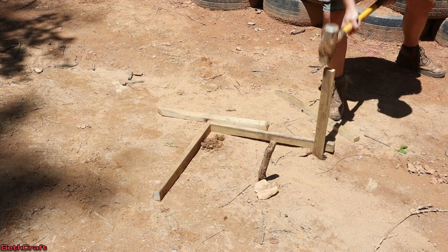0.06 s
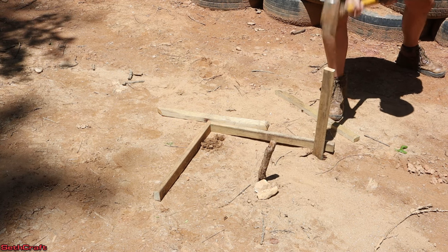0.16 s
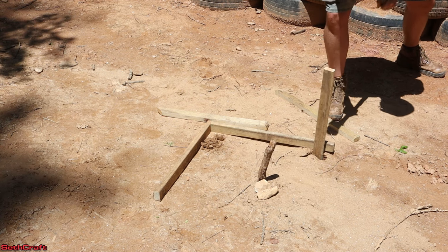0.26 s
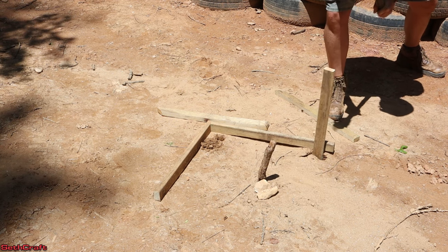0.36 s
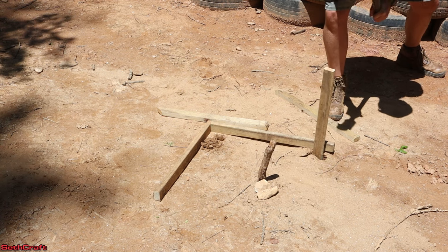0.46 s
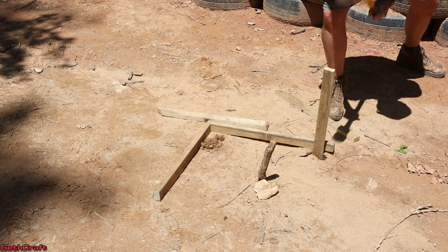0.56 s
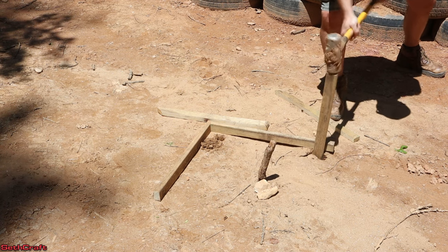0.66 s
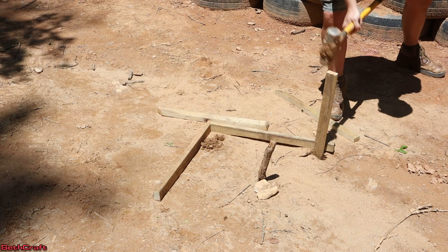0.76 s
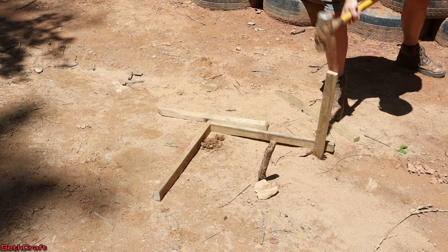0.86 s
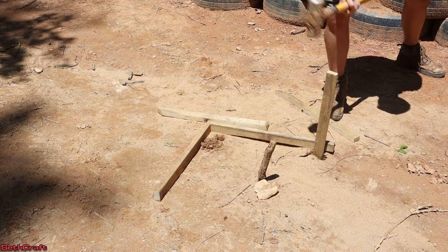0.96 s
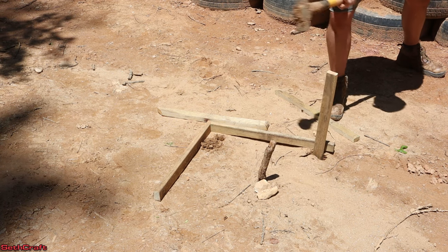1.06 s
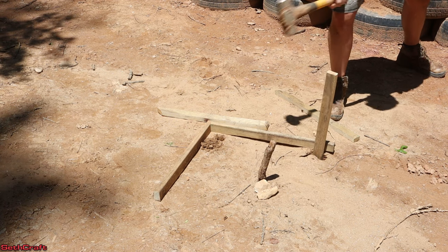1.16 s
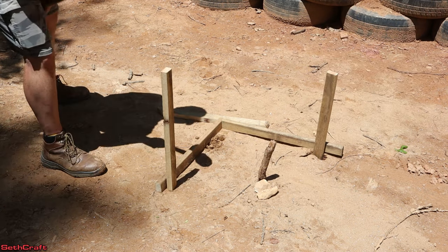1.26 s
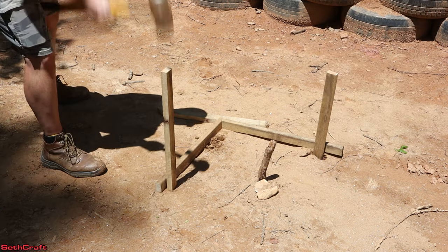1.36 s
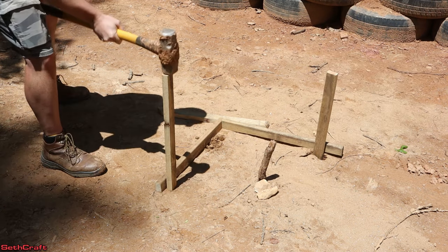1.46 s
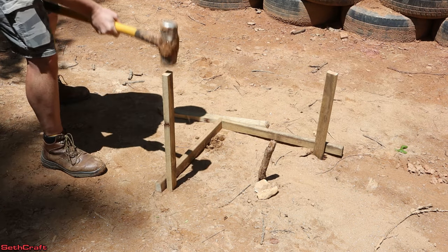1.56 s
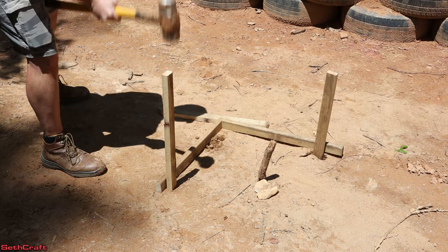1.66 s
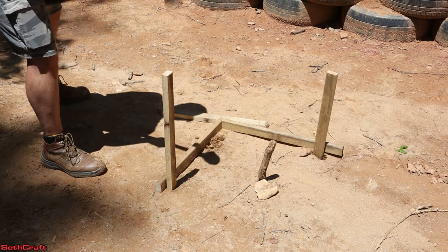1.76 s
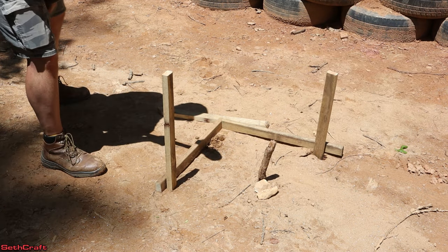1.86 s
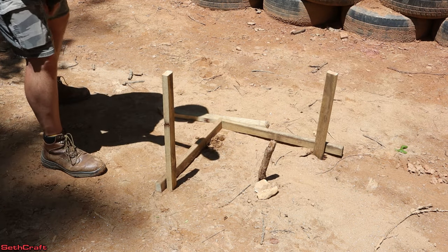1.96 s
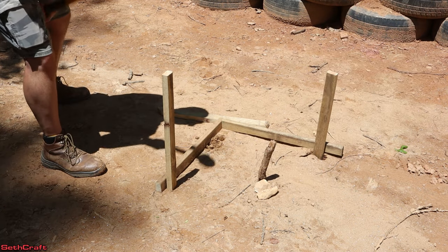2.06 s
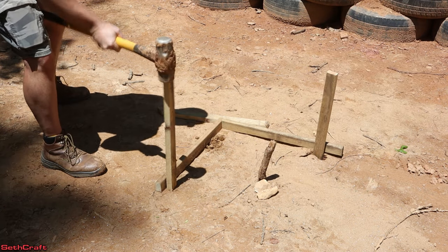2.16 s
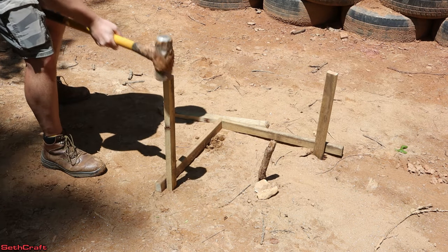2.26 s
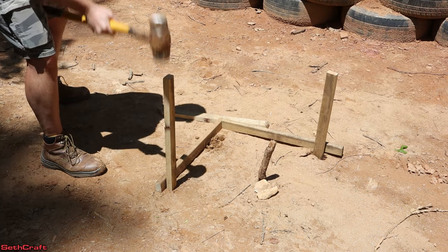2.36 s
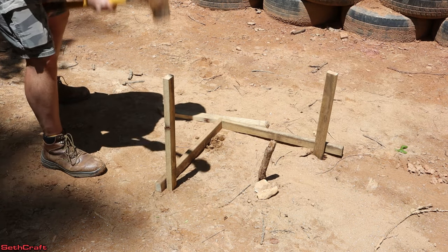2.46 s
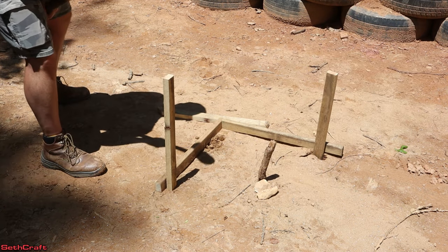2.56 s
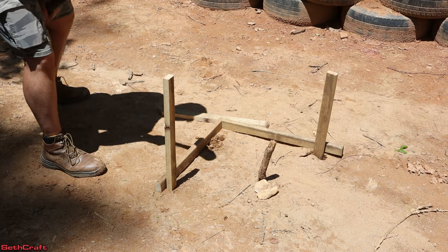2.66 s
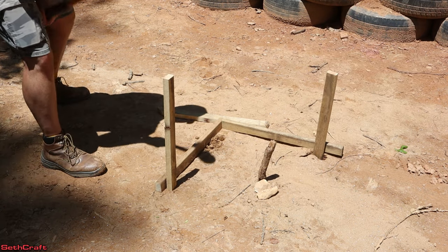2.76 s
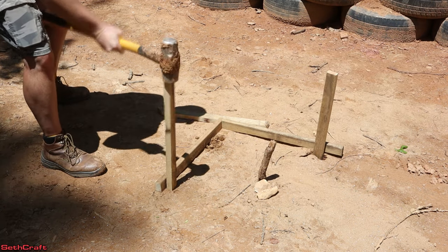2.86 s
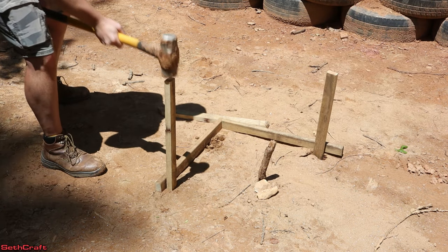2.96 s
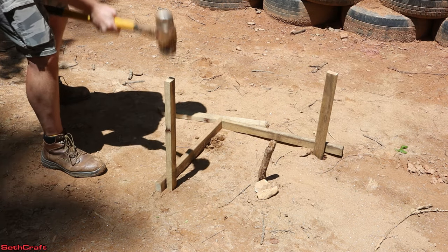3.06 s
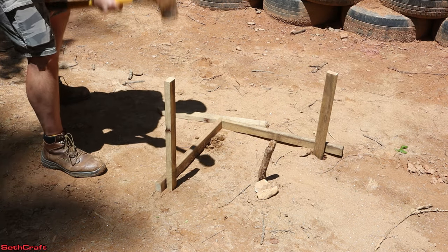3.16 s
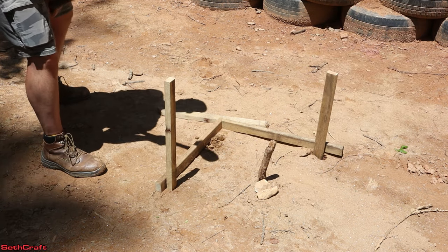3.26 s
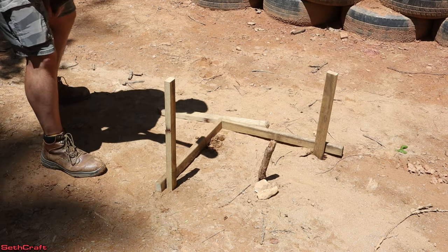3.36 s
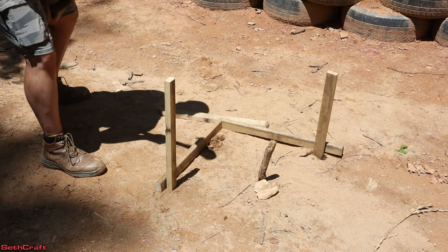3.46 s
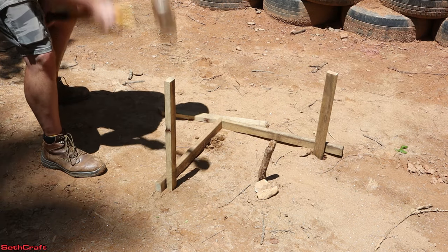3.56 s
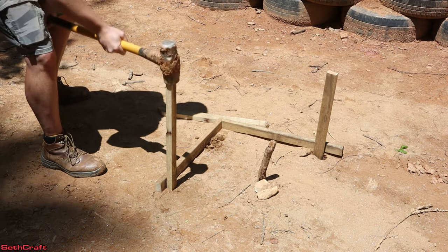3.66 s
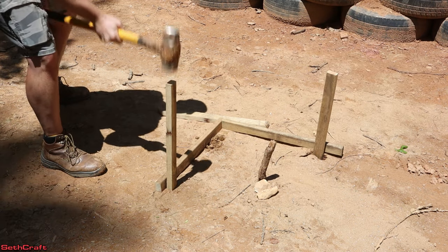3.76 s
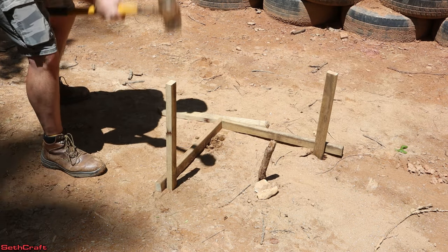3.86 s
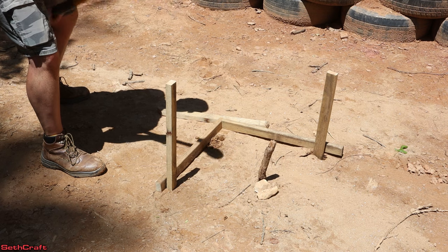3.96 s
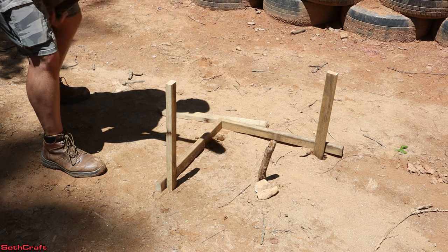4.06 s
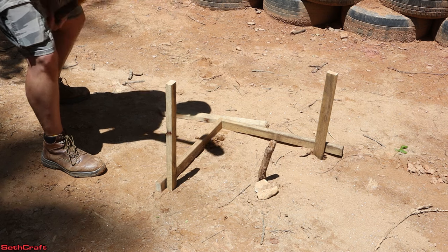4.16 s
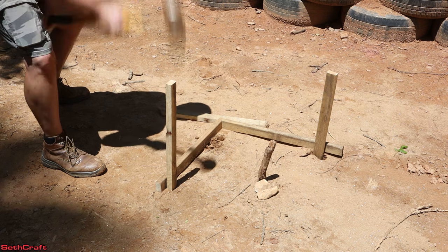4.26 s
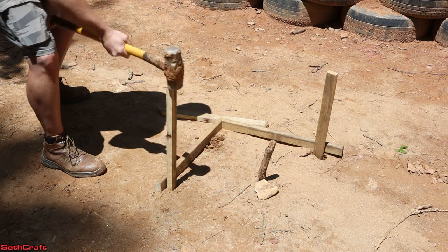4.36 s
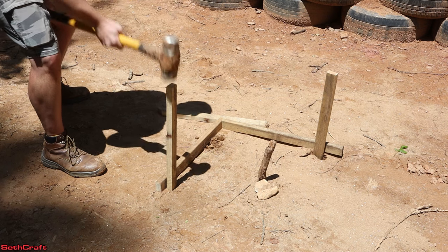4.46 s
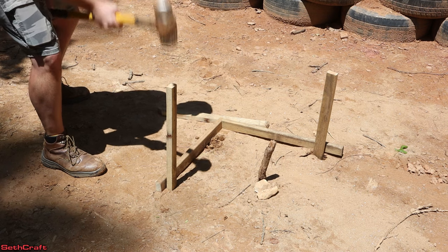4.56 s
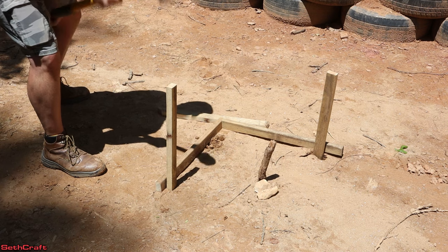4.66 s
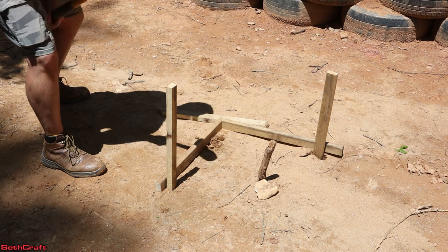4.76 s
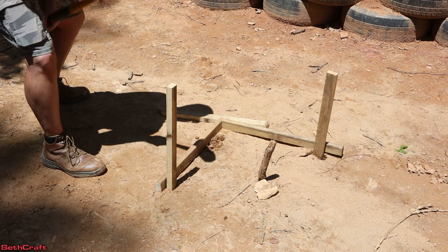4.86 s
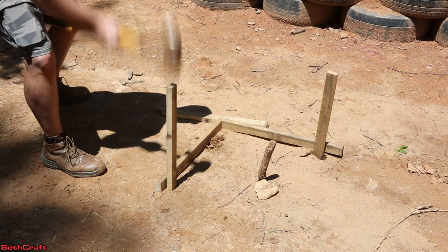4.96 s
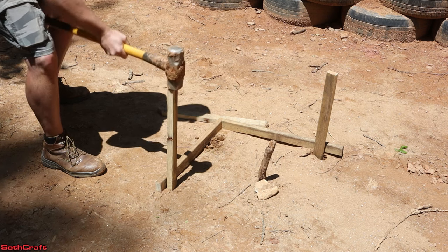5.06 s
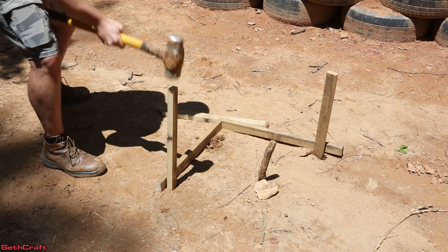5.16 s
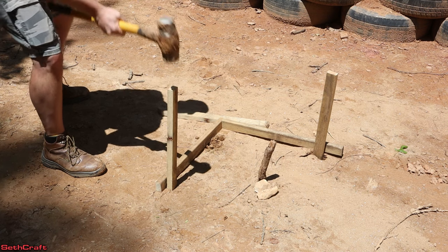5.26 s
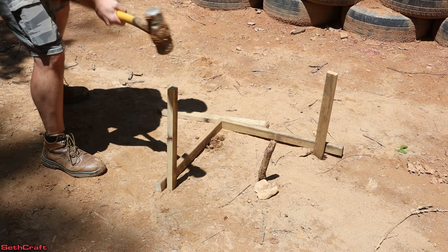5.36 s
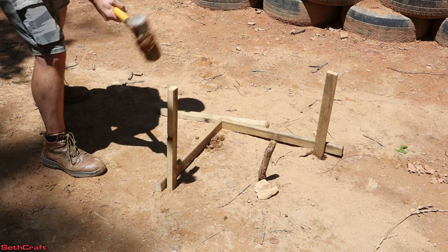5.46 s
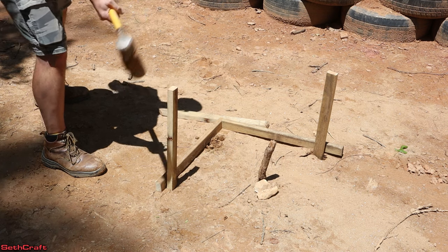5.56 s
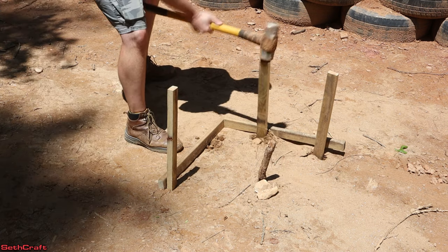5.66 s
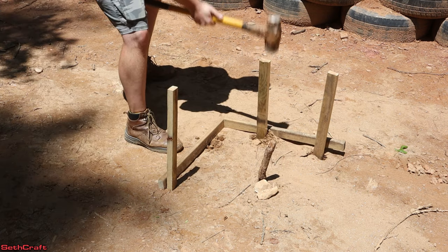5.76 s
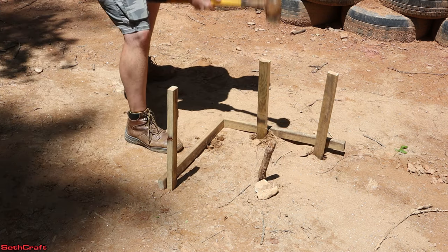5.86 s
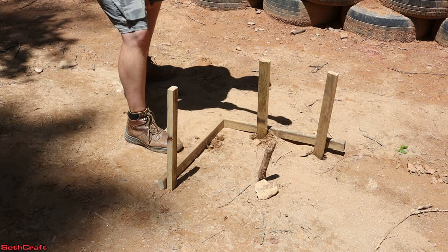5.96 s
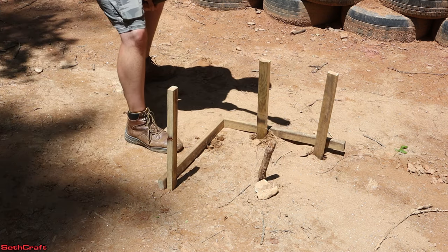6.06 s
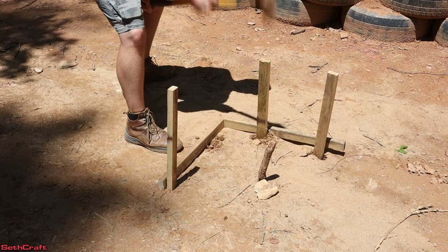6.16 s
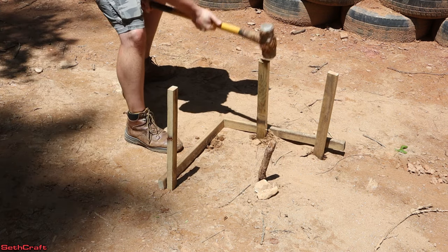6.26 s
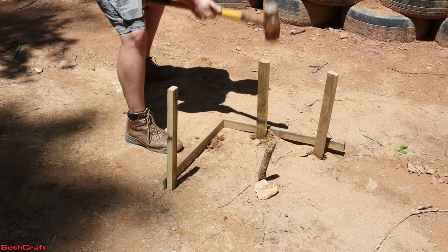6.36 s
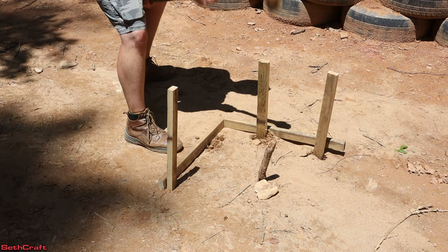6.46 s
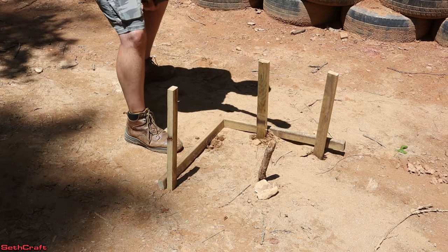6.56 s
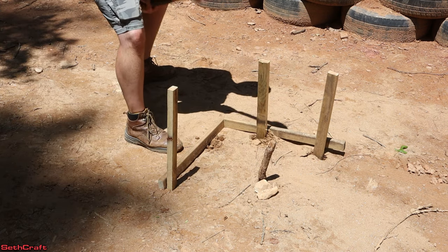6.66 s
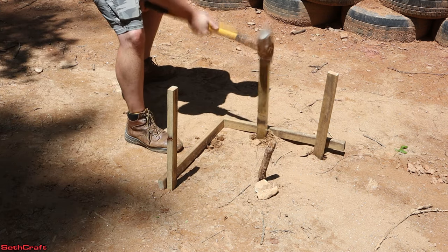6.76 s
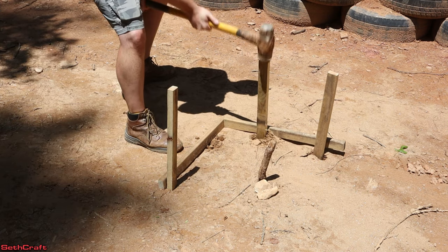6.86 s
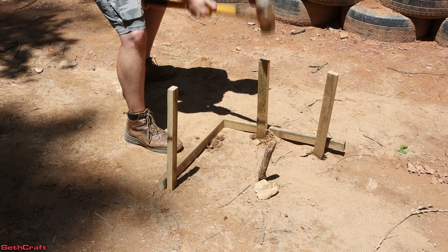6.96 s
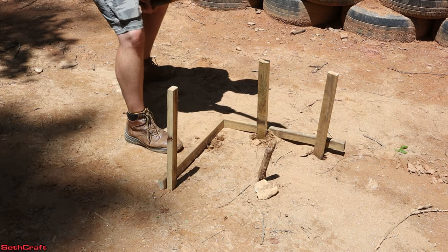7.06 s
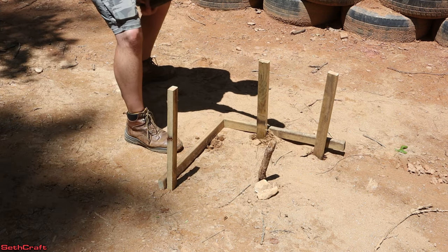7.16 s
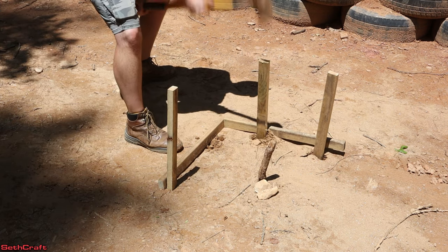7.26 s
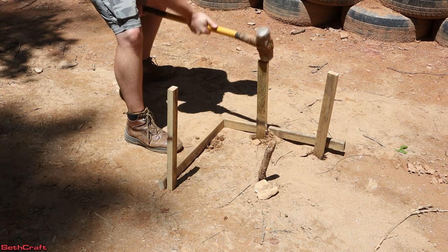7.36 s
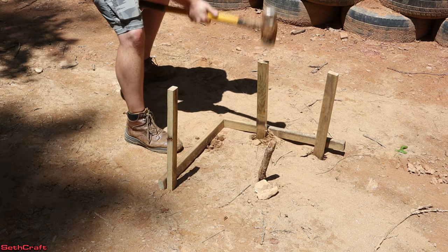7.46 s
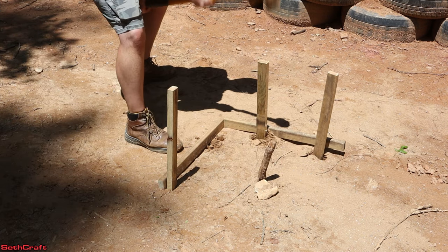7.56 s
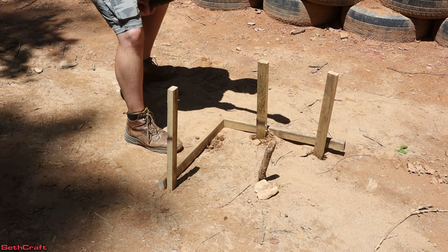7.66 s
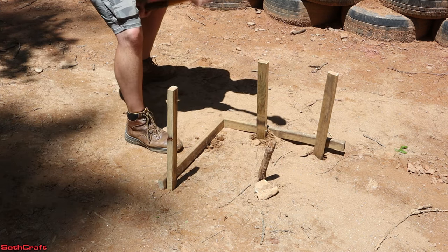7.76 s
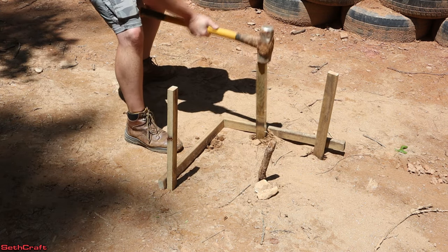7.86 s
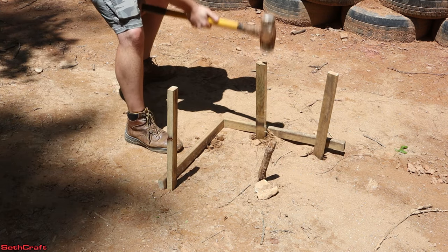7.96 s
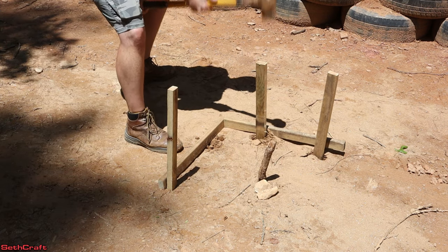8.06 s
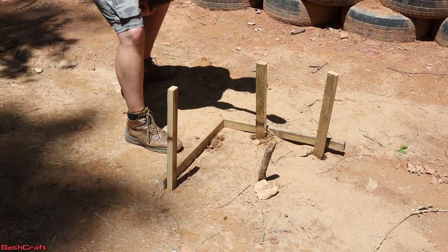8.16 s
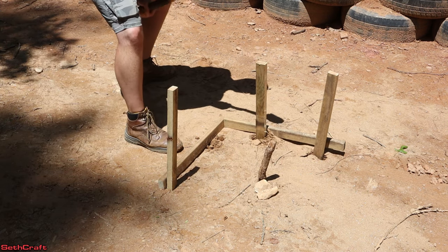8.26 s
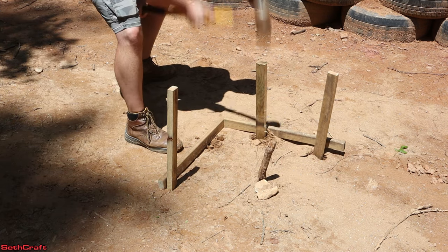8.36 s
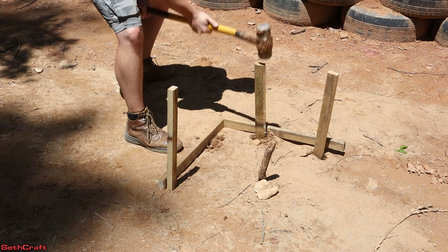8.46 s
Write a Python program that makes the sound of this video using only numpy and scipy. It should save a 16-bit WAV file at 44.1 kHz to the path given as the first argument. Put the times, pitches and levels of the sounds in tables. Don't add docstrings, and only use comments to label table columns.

```python
import sys
import numpy as np
from scipy import signal
from scipy.fft import rfft, irfft
from scipy.io import wavfile

SR = 44100
rng = np.random.default_rng(int(sys.argv[2]) if len(sys.argv) > 2 else 0)


def voltage_ratio(level):
    return 10 ** (np.asarray(level, float) / 20)


def waveform_to_disk(signal):
    frames = np.transpose(np.atleast_2d(signal))
    scaled = np.clip(frames, -1, 1) * 32767
    samples = np.round(scaled).astype(np.int16)
    wavfile.write(sys.argv[1], SR, samples)


N = 375408
TIME = np.arange(N) / SR

# start in seconds, loudness in the trees in dB, sustain of the ring as a factor, soil
# thud in dB, low pulse in dB.
BLOWS = [(0.049, -20, 0.7, -46.5, -22), (0.7345, -21.5, 0.55, -39.5, -40.5),
         (1.499, -12.5, 0.9, -56.5, -35.5), (2.243, -18, 0.46, -49.5, -38), (2.9521, -12, 0.98, -41, -12),
         (3.6999, -15.5, 0.4, -38, -20), (4.3966, -18, 0.7, -41.5, -39.5), (5.08, -14, 0.9, -50, -39.5),
         (5.7495, -20, 0.62, -35, -33), (6.3196, -30.5, 0.43, -25, -25.5), (6.865, -32.5, 0.3, -22, -36),
         (7.418, -25.5, 0.51, -26, -25.5), (7.9532, -27.5, 0.35, -26.5, -42.5),
         (8.4956, -25, 0.35, -30, -25.5)]
# first lengthwise resonance in Hz, step to the next in Hz,
# slope over the upper ones in dB per step, lead resonance heard nearby in Hz, steel click in dB.
LANDINGS = [(900, 830, .5, 1700, -7), (950, 830, -1, 1300, -8), (1470, 735, -3, 1950, -7.5),
            (1340, 750, -3.5, 1710, -10), (920, 910, -3.5, 1800, -8.5), (1450, 740, -4.5, 1840, -7),
            (1060, 800, -5, 1900, -14.5), (970, 925, -4, 1930, -10.5), (1150, 800, -6, 1250, -12),
            (1300, 770, -2, 1380, -14), (820, 940, -2.5, 1130, -18), (1070, 810, -5, 1430, -12.5),
            (1120, 820, -4, 1460, -14), (1050, 850, -5, 1440, -12)]
SCENE_ENDS_S = [
    1.25,
    5.655,
    9,
]
OVERLOAD = [.275, .315, .27]


def rms_one(x):
    return x / np.sqrt(np.mean(x ** 2) + 1e-20)


def at_hz(points, hz, axis=1):
    points = np.array(points)
    return np.interp(np.log(hz), np.log(points[:, 0]), points[:, axis])


def mode(hz, db, t60, t):
    return voltage_ratio(db - 60 * np.maximum(t, 0) / t60) * np.sin(2 * np.pi * hz * t) * (t > 0)


def add(out, start_s, x, end_s=9):
    i = round(start_s * SR)
    x = x[:max(min(N, round(end_s * SR)) - i, 0)]
    out[i:i + len(x)] += x


def drift(rate):
    knots = rng.standard_normal(int(N / SR * rate) + 2)
    return np.interp(TIME * rate, np.arange(len(knots)), knots)


def bandpass(order, low_hz, high_hz, x):
    sos = signal.butter(order, [low_hz, high_hz], "band", fs=SR, output="sos")
    return signal.sosfilt(sos, x)


def bands(size):
    white = rng.standard_normal((2, size))
    edges = 50 * 2 ** np.arange(0, 8.6, .5)
    for k, (low, high) in enumerate(zip(edges, edges[1:])):
        yield np.sqrt(low * high), bandpass(2, low, high, white[k % 2])


def coloured(spectrum, patchy_db):
    return rms_one(sum(voltage_ratio(at_hz(spectrum, hz) + patchy_db * drift(7.9)) * band for hz, band in bands(N)))


def blows():
    # lengthwise ring at the microphone in dB, crack in dB, bank echo in ms,
    # bank echo in dB, swell of the trees in ms, t60 at the microphone in seconds.
    stakes = [
        (-7.5, -10, 9, -10.5, 73, 0.0061),
        (-2, -11.5, 12, -16, 85, 0.0098),
        (-5.5, -15, 9.6, -6.5, 38, 0.0056),
    ]
    # clutter in dB, its t60 in seconds, echo of a near row as a factor,
    # share of scatter before the swell.
    places = [
        (-15.5, 0.3, 0.92, 0.45),
        (-17.5, 0.36, 1.1, 0.55),
        (-12, 0.13, .5, 0.76),
    ]
    echoes = []
    for stake, (clutter_db, clutter_t60, row_size, early) in zip(stakes, places):
        wood = trees(stake[4], row_size, early)
        echoes.append((wood, bank(stake[2], clutter_db, clutter_t60)))
    out, t = np.zeros(N), np.arange(12000) / SR
    for k, (s, far_db, sustain, thud_db, pulse_db) in enumerate(BLOWS):
        n = np.searchsorted(SCENE_ENDS_S, s)
        ring_db, crack_db, _, echo_db, _, near_t60 = stakes[n]
        wood, near_bank = echoes[n]
        ring, scattered = stake_ring(k, n, t, sustain)
        ring = voltage_ratio(ring_db) * ring / np.abs(ring).max()
        near = near_blow(k, n, t, ring, crack_db, near_t60, sustain, far_db)
        low_pulse = -mode(200, pulse_db, 0.017, t)
        add(out, s, near + low_pulse)
        add(out, s, voltage_ratio(echo_db) * signal.fftconvolve(near[:1500], near_bank))
        from_wood = voltage_ratio(far_db - 34.0) * signal.fftconvolve(scattered[:900], wood)
        add(out, s - 300 / SR, from_wood, SCENE_ENDS_S[n])
        add(out, s + 0.0058, -soil_thud(thud_db, t))
    return out


def near_blow(k, n, t, ring, crack_db, near_t60, sustain, far_db):
    # multiple of the lead, level in dB.
    facing = [
        [(.62, 0), (.95, 0.5), (1.97, 2.5), (3.1, -5)],
        [(.56, -10.5), (1, 0.5), (1.27, -2.5), (1.5, -4.5)],
        [(.62, 0), (1, 1.5), (1.55, -9.5), (2.0, -15)],
    ]
    # frequency in Hz, level in dB, t60 in seconds.
    knock = [
        (684, -12, 0.006),
        (745, -13, 0.0058),
        (560, -19, 0.0021),
    ]
    drive_db = [13, 12, 12][n] + 0.43 * far_db + 5.5
    lead_hz, click_db = LANDINGS[k][-2:]
    near = ring
    for x, db in facing[n]:
        hz = x * lead_hz
        near = near - mode(hz, db, (near_t60 + 4 / hz) * (0.55 + .5 * sustain), t)
    grit = bandpass(1, 1200, 9000, rng.standard_normal(len(t)))
    near = near + grit * voltage_ratio(crack_db + click_db + 12 - 60 * t / 0.006)
    knock_hz, knock_db, _ = knock[n]
    near = near - (1.4 - sustain) * 2.4 * mode(*knock[n], t) + mode(1.6 * knock_hz, knock_db, 0.012, t)
    near = near * (1 - np.exp(-(t / 0.00066) ** 2))
    near = signal.sosfilt(signal.butter(2, 300, "high", fs=SR, output="sos"), near)
    return OVERLOAD[n] * voltage_ratio(drive_db) * near / np.abs(near).max()


def stake_ring(k, n, t, sustain):
    levels = [
        (-5.5, 0, -1.5, 1.1, 0.12, -3.5, -11.5, -15.5),
        (-15, 0.048, 0.5, .5, -0.42, -2, -4, -5.5),
        (-4, 0.35, -3.5, 0.46, 0.45, -1.5, -7, -8.5),
    ]
    decays = [0.031, 0.014, 0.011, 0.014, 0.019, 0.017, .011, 0.0069]
    first_hz, step_hz, tilt_db, _, click_db = LANDINGS[k]
    parts = []
    for j, (db, t60) in enumerate(zip(levels[n], decays)):
        part = mode(first_hz + j * step_hz, db + tilt_db * max(j - 1, 0), t60 * sustain, t)
        parts.append(part * (-1) ** j / np.sqrt(t60 / 0.0068))
    parts.append(mode(3100, -1.0, 0.0021, t))
    parts = np.array(parts)
    parts = parts / np.sqrt(np.sum(parts ** 2))
    click = mode(9000, click_db - 7, .0006, t)
    power = np.sum(np.abs(rfft(parts)) ** 2, axis=0) + np.abs(rfft(click)) ** 2
    return parts.sum(axis=0), np.roll(irfft(np.sqrt(power), len(t)), 300)


def bank(echo_ms, clutter_db, clutter_t60):
    t = np.arange(9000) / SR
    late = t - echo_ms / 1000
    noise = rng.standard_normal((2, len(t)))
    spread = np.where(late < 0, np.exp(-(late / .002) ** 2), np.exp(-late / .0035))
    smear = signal.lfilter([1, -.6], [1], noise[0]) * spread
    wash = noise[1] * voltage_ratio(clutter_db - 60 * t / clutter_t60) * (t > .003)
    return (smear + wash) / np.sqrt(np.sum(smear ** 2))


def soil_thud(thud_db, t):
    noise = rng.standard_normal((2, len(t)))
    crumble = bandpass(2, 90, 450, noise[0]) * voltage_ratio(thud_db + 8.5 - 60 * t / 0.1)
    settle = bandpass(2, 40, 170, noise[1]) * voltage_ratio(thud_db + 6.5 - 60 * t / .3)
    thud = mode(140, thud_db + 7.5, 0.05, t) + mode(110, thud_db + 2.5, 0.12, t)
    return (thud + crumble + settle) * (1 - np.exp(-t / 0.0032))


def trees(swell_ms, row_size, early):
    # frequency in Hz, level in dB, t60 in seconds.
    scatter = [(300, -25, .4), (710, -1, 0.63), (1530, 0.5, 0.57), (3080, 1, 0.5), (5500, 5.5, 0.41),
               (8400, -7.5, 0.53), (10800, -8, 0.1), (15000, -4, .2)]
    deep_db, deep_t60_x = -16.5, 4.3
    t, tail = np.arange(SR) / SR, 0
    for hz, band in bands(SR):
        fall_db = 60 * np.maximum(t - swell_ms / 1000, 0) / at_hz(scatter, hz, axis=2)
        decay = voltage_ratio(-fall_db) + voltage_ratio(deep_db - fall_db / deep_t60_x)
        tail = tail + voltage_ratio(at_hz(scatter, hz)) * decay * band
    row = 1 + row_size * np.exp(-((t - .036) / 0.0027) ** 2)
    swell = early + np.clip(1000 * t / swell_ms, 0, 1) ** 2
    return tail * row * swell * (t > .012)


def rebounds():
    # start in seconds, peak in dB.
    contacts = [(0.097, -49), (0.79, -45), (1.555, -18), (2.304, -24), (3.764, -28), (4.448, -21),
                (5.104, -34), (5.127, -25), (5.144, -24.5), (6.882, -21.5), (6.884, -5), (6.893, -10)]
    # frequency in Hz, level in dB, t60 in seconds.
    tap_modes = [(310, -2, 0.0083), (604, 6.5, 0.0048), (1097, 9, 0.003)]
    out, t = np.zeros(N), np.arange(3000) / SR
    tap = sum(mode(hz, db, t60, t) for hz, db, t60 in tap_modes) * (1 - np.exp(-t / 0.0022))
    for s, db in contacts:
        add(out, s, voltage_ratio(db) * tap)
    return out


def low_tones_and_hum():
    # frequency in Hz, level in dB, t60 in seconds, delay in ms.
    low_modes = [(32, -49, 0.61, 100), (58, -49, 0.74, 40), (95, -60.5, 0.4, 10), (80, -60, .2, 25)]
    hum_hz, hum_db, hum_back_s = 43.5, -62.5, .33
    out, t = np.zeros(N), np.arange(SR) / SR
    ring = sum(mode(hz, db, t60, t - ms / 1000) for hz, db, t60, ms in low_modes)
    since = t - hum_back_s
    hum = voltage_ratio(hum_db) * np.sin(2 * np.pi * hum_hz * since) * np.clip(since / 0.23, 0, 1)
    starts = [-.7] + [blow[0] for blow in BLOWS]
    for s, following in zip(starts, starts[1:] + [9]):
        skip = round(max(-s, 0) * SR)
        add(out, max(s, 0), (ring + hum)[skip:], following)
    return out


def bird():
    # time in seconds, pitch in Hz, level in dB.
    calls = [
        [(7.118, 3300, -80), (7.132, 3570, -76), (7.146, 3650, -74)],
        [(7.15, 2694, -81), (7.18, 2726, -65), (7.195, 3160, -73), (7.205, 4000, -65), (7.225, 5050, -72),
         (7.238, 4046, -71), (7.275, 3700, -68), (7.29, 3730, -85), (7.33, 3750, -78)],
        [(7.32, 2450, -72), (7.345, 3050, -63), (7.355, 3000, -66), (7.366, 2520, -75), (7.378, 3280, -58),
         (7.395, 3517, -67), (7.41, 2790, -58), (7.425, 2700, -66)],
        [(7.72, 3287, -90), (7.74, 3370, -76), (7.75, 3400, -85)],
        [(7.855, 3800, -84), (7.865, 3760, -70), (7.88, 3600, -77)],
        [(5.45, 2680, -78.5), (5.58, 2650, -70.5), (5.655, 2640, -76)],
    ]
    out, t = np.zeros(N), np.arange(4000) / SR
    for note in calls:
        s, hz, db = np.transpose(note)
        phase = 2 * np.pi * np.cumsum(np.interp(TIME, s, hz) + 60 * drift(250)) / SR
        level_db = np.interp(TIME, s, db, left=-150, right=-150) + 4.0 * drift(110)
        out += voltage_ratio(level_db) * np.sin(phase)
    leaves = voltage_ratio(-29 - 60 * t / .12) * rng.standard_normal(len(t))
    return out + signal.fftconvolve(out, leaves)[:N]


def wind():
    # time in seconds, level in dB, centre of the rumble in Hz.
    gusts = [(0, -58, 245), (.68, -56.5, 245), (1.18, -54.5, 250.5), (1.25, -59.5, 250), (1.26, -64.5, 348),
             (1.6, -66.5, 400), (2.3, -68, 331), (2.65, -62.5, 300), (3.15, -65.5, 253), (3.85, -64.5, 310),
             (4.601, -66.5, 269.6), (5.3, -67.5, 260), (5.65, -59, 317.6), (5.67, -71, 200),
             (6.7, -72.5, 194), (7.45, -68.5, 190), (7.8, -74, 210), (8.51, -72, 201.2)]
    slopes = (12, 16)
    s, db, centre_hz = np.transpose(gusts)
    out, centre = 0, np.interp(TIME, s, np.log2(centre_hz))
    for hz, band in bands(N):
        if hz < 1500:
            away = np.log2(hz) - centre
            fall_db = np.where(away < 0, *slopes) * away ** 2
            out = out + voltage_ratio(3.5 * drift(7.8) - fall_db) * rms_one(band)
    return voltage_ratio(np.interp(TIME, s, db) - 5.5 + 1.4 * drift(14)) * out


def background():
    # frequency in Hz, level in dB per Hz.
    air_colour = [(29, -25), (50, 8.5), (76, -31.5), (132, -3.5), (160, -29.5), (403, -19.5), (539, -29.5),
                  (655, -20.5), (1320, -25), (3250, -29), (4340, -37), (14300, -40.5), (16500, -53)]
    air_db = [-68, -67.5, -69.5]
    # time in seconds, level in dB.
    rustle = [
        (5.57, -104),
        (5.62, -67.5),
        (5.655, -80),
        (5.66, -110),
    ]
    air = voltage_ratio(np.array(air_db)[np.searchsorted(SCENE_ENDS_S, TIME)]) * coloured(air_colour, patchy_db=-0.5)
    hiss = bandpass(1, 2500, 14000, rng.standard_normal(N))
    return air + voltage_ratio(np.interp(TIME, *np.transpose(rustle), left=-140, right=-140)) * hiss


def scene():
    return (blows() + rebounds() + low_tones_and_hum() + wind() + background() + bird())[None]


def top_cut(x):
    return signal.sosfilt(signal.butter(12, 16820, fs=SR, output="sos"), x)


def record(dry):
    top = np.array(OVERLOAD)[np.searchsorted(SCENE_ENDS_S, TIME)]
    dull = signal.sosfilt(signal.butter(1, 15000, fs=SR, output="sos"), np.clip(dry, -top, top))
    return top_cut(dull)


dry = scene()
out = record(dry)
waveform_to_disk(out)
```